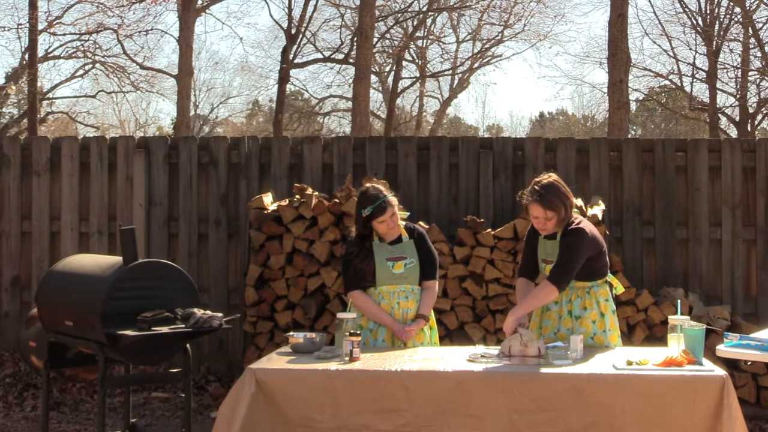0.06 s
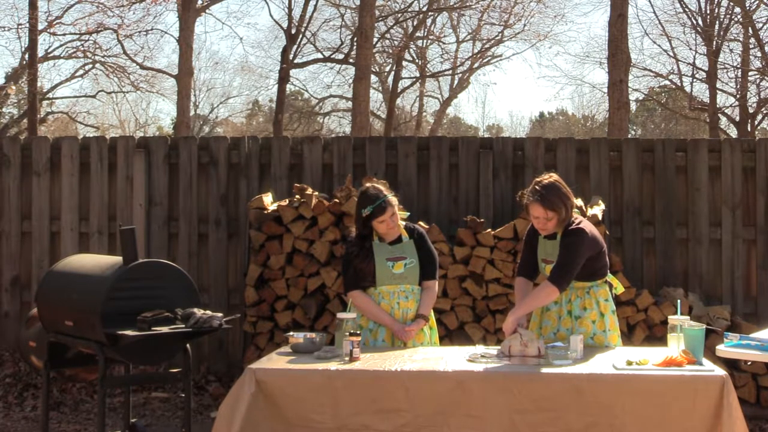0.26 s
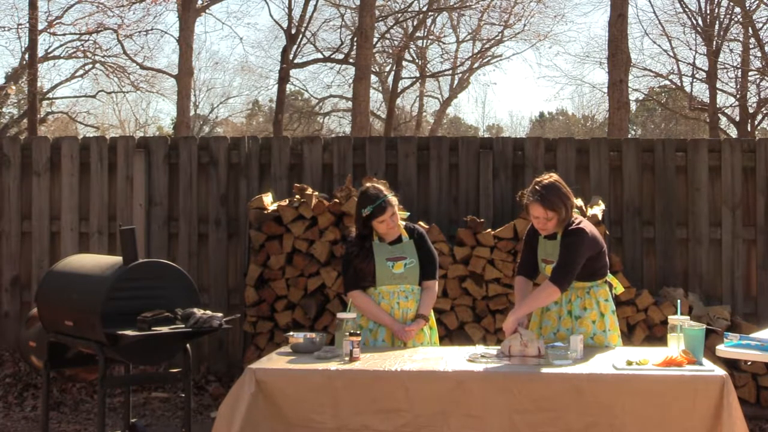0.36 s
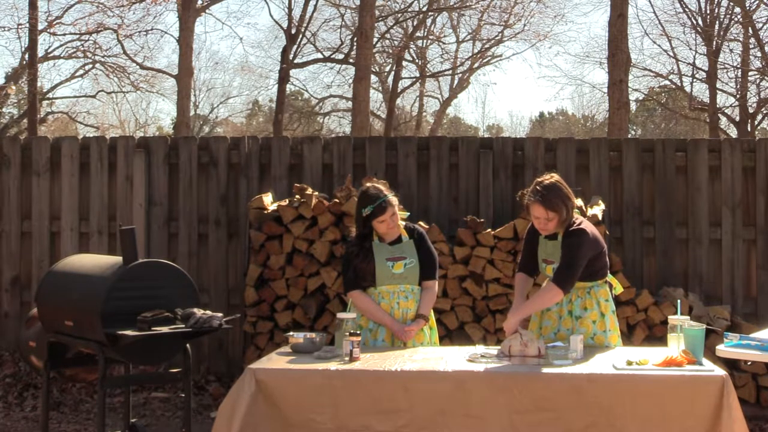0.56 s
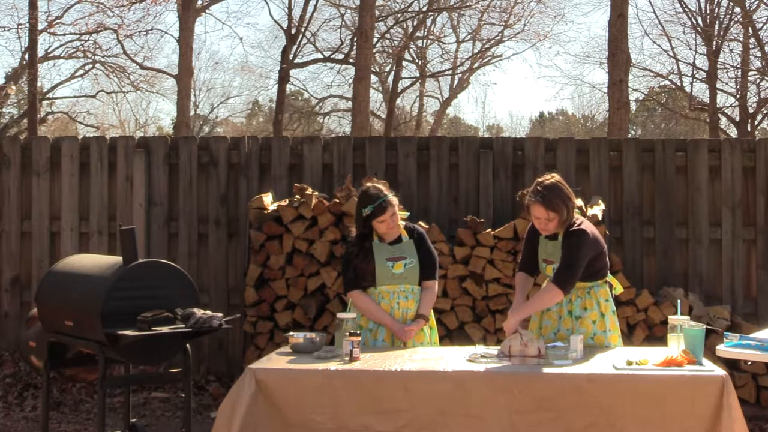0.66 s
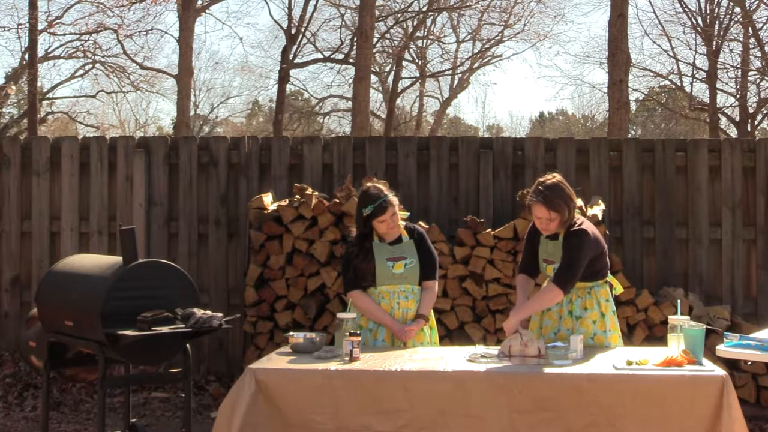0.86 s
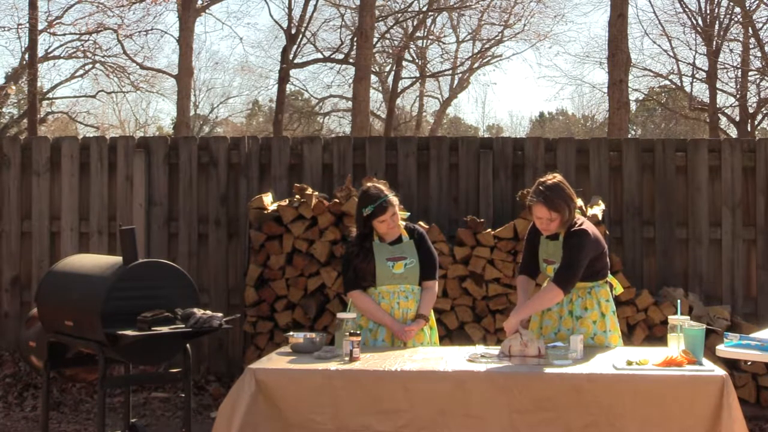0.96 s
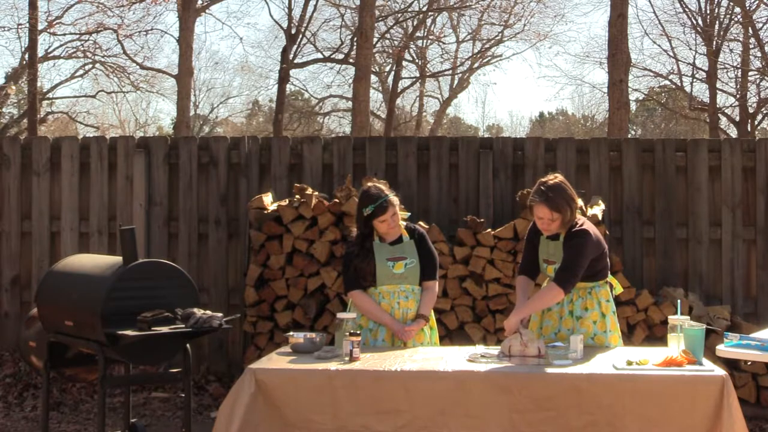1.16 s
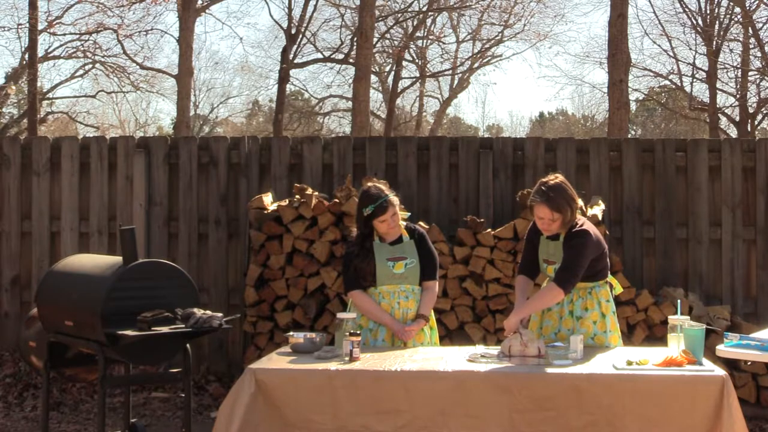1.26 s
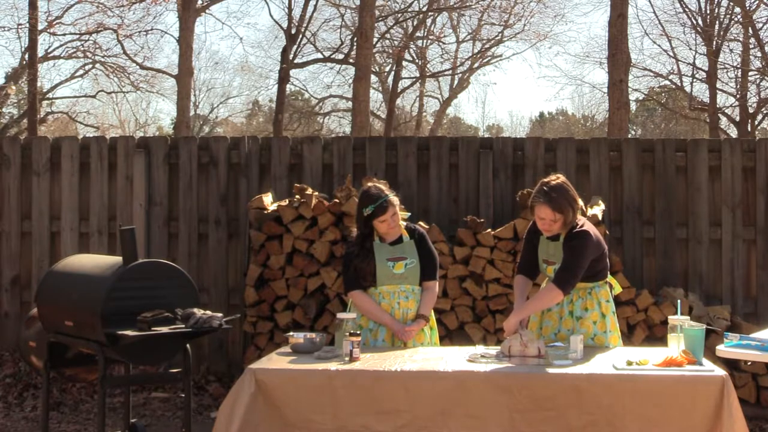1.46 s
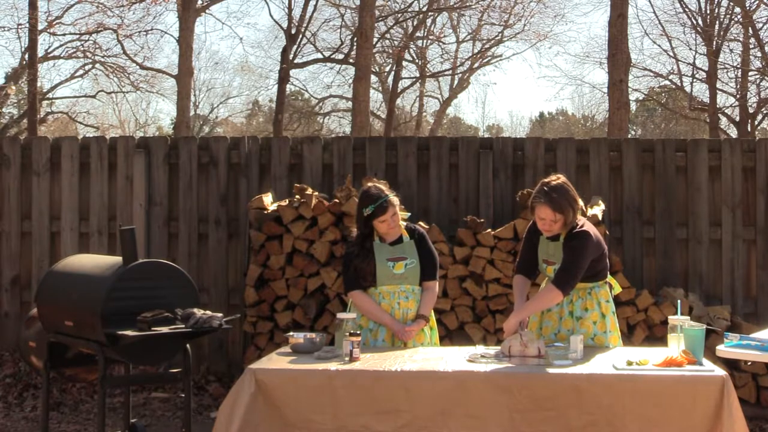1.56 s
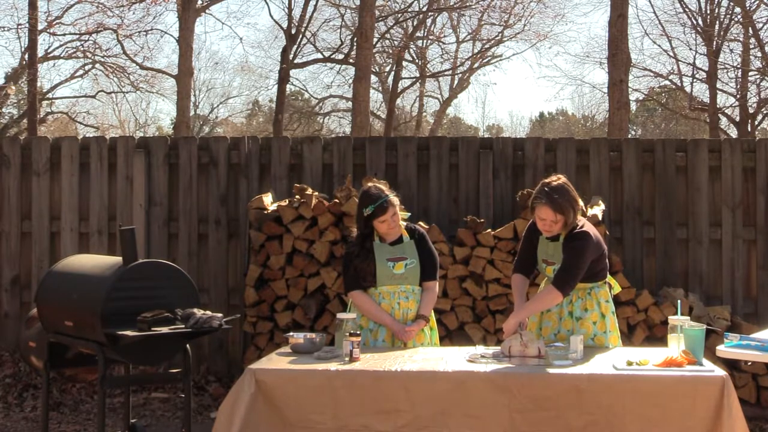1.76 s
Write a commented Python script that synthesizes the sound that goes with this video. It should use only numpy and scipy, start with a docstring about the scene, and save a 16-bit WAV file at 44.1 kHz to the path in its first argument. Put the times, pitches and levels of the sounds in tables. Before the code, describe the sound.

Outdoors in a yard, a chicken bone cracks once between shears, bright and short with a quick echo. Afterwards the blades tick and rub softly in the meat, while a far engine and traffic hum faintly.

```python
"""A faint creak and then a sharp crack: poultry shears snap one chicken bone at a table in a fenced yard.
The bone fails in a quick run of fractures, each an impulse coloured by short ringing peaks.
Table, ground, woodpile and fence reflect the crack, and a short diffuse tail dies away.
Small ticks and wet rustles of the meat follow, over the hum of a distant engine and faint traffic."""
import sys
import numpy as np
from scipy import signal
from scipy.fft import rfft, irfft
from scipy.io import wavfile
from scipy.ndimage import uniform_filter1d

SR = 44100
rng = np.random.default_rng(int(sys.argv[2]) if len(sys.argv) > 2 else 0)


def log_audio(samples):
    """Write samples as a 16-bit WAV file to the path given in sys.argv[1]."""
    # one column per channel
    frames = np.atleast_2d(samples).T
    # limit to full scale, then quantise
    limited = np.clip(frames, -1, 1)
    pcm = np.round(limited * 32767).astype(np.int16)
    wavfile.write(sys.argv[1], SR, pcm)


N = 79380

# impulses of the breaking bone: (time [s], relative level [dB])
BONE_FRACTURES = [(.2038, -5.5), (.20422, -1.5), (.20507, -24.5)]
# spectrum of one fracture: (frequency [Hz], relative level [dB])
FRACTURE_SPECTRUM = [(60, -72.5), (230, -47.5), (380, -17), (620, -8.5), (850, -27), (1400, -10.5),
                     (1900, 3.5), (3000, -1), (4500, 6.5), (8000, 5.5), (11000, -1.5), (15500, -6)]
# short ringing peaks that colour the crack: (frequency [Hz], relative level [dB], t60 [s])
CRACK_RESONANCES = [(1900, -19.5, 0.016), (2333, -15.5, .015), (3760, -20, .016), (4270, -14.5, .02),
                    (4718, -12.5, 0.018), (5573, -12, .014), (6507, -20, .012), (8240, -29.5, .01),
                    (8400, -30, .01)]
# resonances of the freed blades: (frequency [Hz], bandwidth [Hz], level [dB], t60 [s])
FREE_BLADE_BANDS = [(2330, 300, -55.5, .45), (4280, 340, -50, 0.71), (4720, 400, -53, .54)]
# reflections from the ground and nearest surfaces: (delay [s], gain [dB], cutoff [Hz])
FLAT_REFLECTIONS = [(.0104, -8.5, 8884), (0.0149, -15.5, 5000), (.025, -15.5, 12000)]
# reflections from woodpile and fence: (delay [s], gain [dB], decay [s], centre [Hz], bandwidth [Hz])
ROUGH_REFLECTIONS = [(0.011, 4, .011, 2430, 2203), (0.013, 9.5, .005, 440, 219.6),
                     (.0235, 3, .0035, 7850, 900), (.058, -4, 0.015, 2200, 2210),
                     (.064, -1, 0.0073, 4170, 694), (.102, -13, .012, 2270, 1550)]
# diffuse field of the yard: (frequency [Hz], gain [dB], t60 [s])
REVERB_BANDS = [(500, -4, .35), (1100, -0.5, .33), (1800, -3, 0.37), (2500, -8, 0.71), (3500, -3, .29),
                (4400, -2.5, 0.2), (5600, -8, 0.16), (7800, -7, 0.3), (11000, -12, 0.16),
                (15000, -13, .165)]
# contacts of bone and blade: (time [s], level [dB], centre [Hz], bandwidth [Hz], decay [s])
BLADE_TICKS = [(.162, -41.5, 2300, 350, .004), (.162, -55, 10000, 9000, .002),
               (.401, -68, 3500, 3000, .005), (.411, -59, 10000, 9000, .012), (.659, -71, 7500, 3000, .008),
               (1.164, -69, 4500, 5000, .003), (1.193, -66, 2600, 400, .005),
               (1.392, -69, 5500, 6000, .002), (1.541, -65, 2500, 3500, .004), (1.542, -55, 560, 200, .005),
               (1.6254, -61, 6500, 6000, .002)]
# blades rubbing meat and bone: (time [s], level [dB], centre [Hz], bandwidth [Hz], spread [s])
BLADE_RUBS = [(.174, -61, 2268, 649.3, 0.015), (0.177, -67, 8000, 8000, .018),
              (0.197, -45.5, 2285, 920, .005), (0.2, -47, 8020, 12210, .0045),
              (0.327, -56.5, 665, 98.5, .02), (0.427, -67.5, 5760, 6000, 0.017),
              (.57, -77.5, 7400, 5000, .03), (.69, -74, 4500, 6000, .012), (1.632, -75, 7300, 2200, .015)]
# the engine's two main tones: (time [s], upper tone level [dB], lower tone level [dB])
ENGINE_LEVELS = [(0, -54, -51), (0.162, -54, -55), (0.204, -58, -56), (.28, -53, -55.5), (.48, -52.5, -60),
                 (0.629, -65.5, -61), (.71, -52, -58), (1.1, -53, -62.5), (1.42, -52, -58),
                 (1.56, -66.5, -66.5), (1.8, -69, -56.5)]
# weaker engine tones: (frequency [Hz], level [dB])
ENGINE_WEAK_TONES = [(49, -76), (119, -67), (149, -73.5), (171, -70), (205, -71)]
# spectrum of distant traffic: (frequency [Hz], relative level [dB])
TRAFFIC_SPECTRUM = [(25, -19), (50, -0.5), (90, 7), (160, -2.5), (260, -5), (450, -3.5), (700, -6),
                    (950, -10), (1300, -19), (2500, -26), (4500, -27), (8000, -34.5), (15500, -40)]

BREAK_S = BONE_FRACTURES[0][0]
TABLE_DELAY_S = .001665  # extra travel time by way of the table top


def bone_snap(click_db=1.5, splinter_db=1, splinter_s=.0023, table_db=-6):
    """Impulse excitation: each fracture clicks and rings briefly; the table's echo is a comb filter."""
    spectrum = colour(FRACTURE_SPECTRUM)
    impulses = sum(undb(db) * delay(s) for s, db in BONE_FRACTURES)
    click = undb(click_db) * irfft(spectrum)[:N]
    ringing_peaks = through(ring(CRACK_RESONANCES), resonance(hz=4500, width=9000))
    splinters = undb(splinter_db) * through(scatter(splinter_s), spectrum * delay(BREAK_S))
    direct = through(click + ringing_peaks, impulses) + splinters
    return through(direct, 1 + undb(table_db) * delay(TABLE_DELAY_S))


def blade_ring():
    """Free vibration: once the bone parts, the freed blades sound faintly in decaying bands of noise."""
    return sum(undb(db) * band(hz, width) * fade(BREAK_S, t60 / np.log(1000))
               for hz, width, db, t60 in FREE_BLADE_BANDS)


def with_reflections(x):
    """Specular reflection: flat surfaces add delayed, duller copies to the direct sound."""
    echoes = sum(undb(db) * delay(s) / (1 + 1j * bins() / cutoff) for s, db, cutoff in FLAT_REFLECTIONS)
    return through(x, 1 + echoes)


def yard_scatter(near_db=-6, near_s=.016):
    """Scattering: things on the table, woodpile and fence spread the crack into echoes and a tail."""
    t = clock()
    response = undb(near_db) * through(scatter(near_s), delay(TABLE_DELAY_S))
    for s, db, decay, hz, width in ROUGH_REFLECTIONS:
        cloud = scatter(decay) * (1 - np.exp(-2 * t / decay))
        response += undb(db) * through(cloud, delay(s) * resonance(hz, width))
    log_centres = np.log([hz for hz, _, _ in REVERB_BANDS])
    build_up = 1 - np.exp(-t / near_s)
    for selector, (_, db, t60) in zip(np.eye(len(REVERB_BANDS)), REVERB_BANDS):
        band_gain = np.sqrt(np.interp(np.log(bins()), log_centres, selector))  # equal-power overlap
        tail = through(scatter(t60 / np.log(1000)), band_gain)
        response += undb(db) * tail * build_up
    return through(response, colour(FRACTURE_SPECTRUM) * delay(BREAK_S))


def cutting(tick_rise_s=.00037):
    """Impact and friction: the blades tick on bone and rub through the meat in soft swells of noise."""
    t = clock()
    ticks = sum(undb(db) * band(hz, width) * (fade(s, decay) - fade(s, tick_rise_s))
                for s, db, hz, width, decay in BLADE_TICKS)
    rubs = sum(undb(db) * band(hz, width) * np.exp(-.5 * ((t - s) / spread) ** 2)
               for s, db, hz, width, spread in BLADE_RUBS)
    return ticks + rubs


def wet_crackle(pops_per_s=75, level_db=-84, decay_s=.003):
    """A Poisson process: skin and gristle tear in tiny, independent pops."""
    pops = (rng.random(N) < pops_per_s / SR) * rng.uniform(-1.02, 1, N)
    pop_spectrum = rfft(scatter(decay_s), 2 * N) * resonance(hz=3000, width=4600) ** 2
    return undb(level_db) * unit(through(pops, pop_spectrum))


def engine(upper_hz=104.3, lower_hz=87.4, drift=.006, waver_db=-.5):
    """Beating: two close low tones throb among weaker ones, all wavering in pitch and level."""
    t = clock()
    times, upper_db, lower_db = np.array(ENGINE_LEVELS).T
    main_tones = [(upper_hz, np.interp(t, times, upper_db)), (lower_hz, np.interp(t, times, lower_db))]
    hum = np.zeros(N)
    for hz, db in main_tones + ENGINE_WEAK_TONES:
        amplitude = np.sqrt(2) * undb(db + waver_db * wander(10))
        cycles = rng.random() + np.cumsum(hz * (1 + drift * wander(4.9))) / SR
        hum += amplitude * np.sin(2 * np.pi * cycles)
    return hum


def traffic(level_db=-58, swell_db=.5):
    """Incoherent summation: far roads merge into a dull, nearly steady noise."""
    amplitude = undb(level_db + swell_db * wander(18))
    return amplitude * unit(through(rng.standard_normal(N), colour(TRAFFIC_SPECTRUM)))


def undb(db):
    """Amplitude ratio of a level in decibels."""
    return 10 ** (np.asarray(db) / 20)


def clock():
    """Time of each sample in seconds."""
    return np.arange(N) / SR


def bins():
    """Frequency axis in hertz, offset from zero so that its logarithm is finite."""
    return np.arange(N + 1) * SR / (2 * N) + 1e-6


def unit(x):
    """Normalisation to rms 1."""
    return x / np.sqrt(np.mean(x ** 2))


def through(x, response):
    """Convolution: the spectrum is multiplied by a frequency response."""
    return irfft(rfft(x, 2 * N) * response)[:N]


def delay(s):
    """Linear phase: the response of a pure delay."""
    return np.exp(-2j * np.pi * bins() * s)


def resonance(hz, width):
    """Second-order band-pass response with gain 1 at its centre."""
    f = bins()
    return 1 / (1 + 1j * (f * f - hz * hz) / (f * width))


def colour(points):
    """Minimum-phase response through (frequency [Hz], level [dB]) points."""
    hz, db = np.array(points).T
    magnitude = undb(np.interp(np.log(bins()), np.log(hz), db))
    cepstrum = irfft(np.log(magnitude))
    return np.exp(rfft(np.r_[cepstrum[0], 2 * cepstrum[1:N]], 2 * N))


def band(hz, width):
    """Band noise of rms 1, shaped by two equal resonances in cascade."""
    return unit(through(rng.standard_normal(N), resonance(hz, width) ** 2))


def fade(start, decay):
    """Exponential decay after a sudden onset."""
    age = clock() - start
    return (age >= 0) * np.exp(-np.abs(age) / decay)


def scatter(decay):
    """Diffuse impulse response: decaying noise of energy 1."""
    cloud = rng.standard_normal(N) * fade(0, decay)
    return cloud / np.sqrt(np.sum(cloud ** 2))


def ring(peaks):
    """Damped oscillation: one decaying sine for each spectral peak."""
    t = clock()
    return sum(undb(db) * np.sin(2 * np.pi * hz * t) * np.exp(-np.log(1000) * t / t60)
               for hz, db, t60 in peaks)


def wander(rate_hz):
    """Slow random modulation of rms 1: random steps, smoothed twice."""
    hold = int(SR / rate_hz)
    steps = np.repeat(rng.standard_normal(N // hold + 2), hold)
    return unit(uniform_filter1d(uniform_filter1d(steps, hold), hold)[:N])


def scene():
    """Superposition: the snap, its echoes and the cutting sounds add to the background in one channel."""
    background = traffic() + engine()
    crack = with_reflections(bone_snap()) + yard_scatter() + blade_ring()
    return (crack + cutting() + wet_crackle() + background)[None]


def record(dry, cutoff_hz=16100):
    """Band limiting: a steep elliptic low-pass removes the highest treble."""
    return signal.sosfilt(signal.ellip(8, .2, 70, cutoff_hz, fs=SR, output="sos"), dry)


dry = scene()
out = record(dry)
log_audio(out)
```